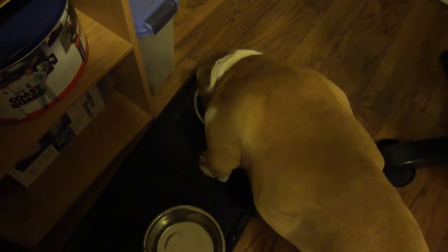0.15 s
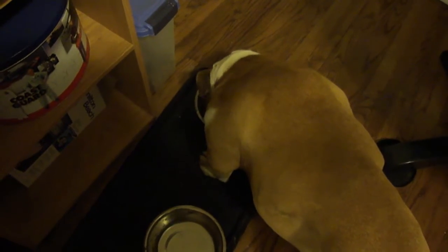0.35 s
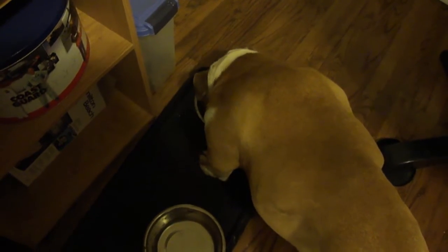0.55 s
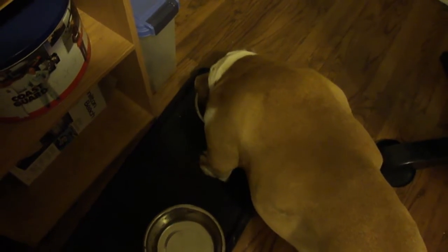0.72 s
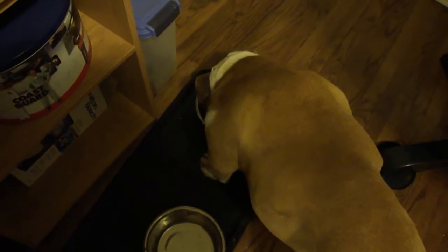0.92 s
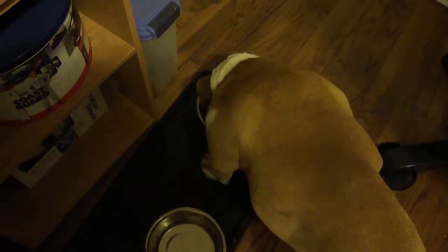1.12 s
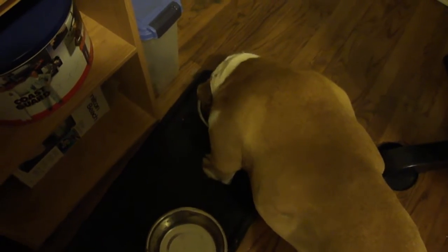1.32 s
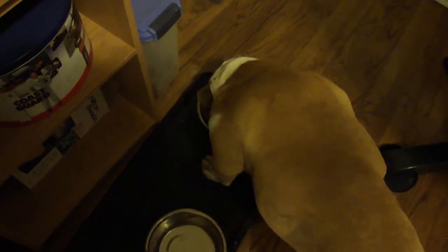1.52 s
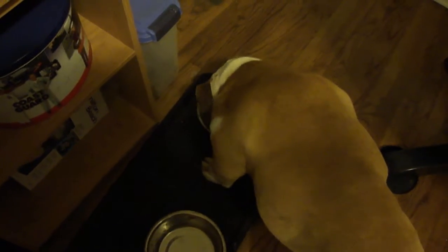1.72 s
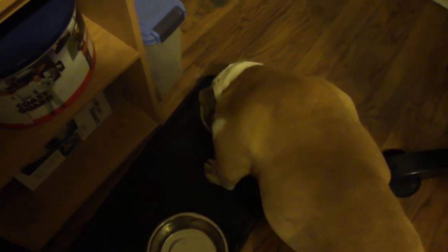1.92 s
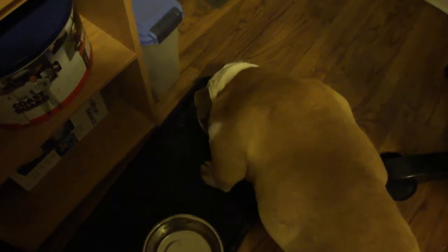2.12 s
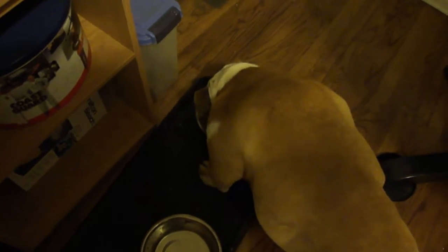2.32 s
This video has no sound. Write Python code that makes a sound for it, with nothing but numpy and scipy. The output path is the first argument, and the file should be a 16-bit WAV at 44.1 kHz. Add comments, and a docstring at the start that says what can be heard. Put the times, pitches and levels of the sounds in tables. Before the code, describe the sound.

Wet chomping and lip smacks of a dog eating from a metal bowl indoors.

```python
"""A dog gulps wet food from a bowl on the floor of a wooden room, about three bites a second.
Each bite is a lip smack and a few squelches of jaw and tongue, made of tiny bursting bubbles.
The bowl rings along, is nudged by the muzzle and bumps on its mat.
The room answers with short echoes, over a quiet, steady background noise."""
import sys
import numpy as np
from scipy import signal
from scipy.fft import rfft, irfft
from scipy.io import wavfile

SR = 44100
rng = np.random.default_rng(int(sys.argv[2]) if len(sys.argv) > 2 else 0)


def unload_audio(sound):
    """Save the sound as a 16-bit wav file, at the path given as the first command line argument."""
    columns = np.transpose(np.atleast_2d(sound))
    # keep every value between -1 and 1, then stretch to whole-number steps
    steps = np.round(np.clip(columns, -1, 1) * 32767)
    wavfile.write(sys.argv[1], SR, steps.astype(np.int16))


N = 110250

# Jaw and tongue crushing food. In every table, levels are relative to each other.
# peak_s, rise_s, fade_s, jaw_hz, jaw_db, hollow_hz, hollow_db, squelch_db, spray_db
FOOD_SQUEEZES = [ (0.208, 0.0064, 0.007, 440, -63, 1110, -45.5, -40, -46.5),
                 (.224, 0.0046, 0.0072, 427, -38, 1010, -31.5, -34.5, -49),
                 (.245, .0018, .0099, 455, -35, 990, -30, -49, -48),
                 (.272, 0.0048, .0092, 470, -46, 1110, -37, -34, -44.5),
                 (.316, 0.00057, 0.0092, 343, -19, 1086, -25.5, -29, -37),
                 (.346, .006, .0073, 387, -36, 1180, -21, -31.5, -37),
                 (.477, 0.0053, 0.005, 435, -49, 1100, -38.5, -37.5, -48.5),
                 (.566, 0.0059, 0.0042, 437, -29.5, 950, -27, -29, -37.5),
                 (.575, 0.0025, 0.0084, 410, -24, 928, -24.5, -28.5, -38),
                 (.610, 0.0058, 0.0079, 420, -40, 1100, -39, -31.5, -46),
                 (.655, 0.0052, 0.0085, 387, -32, 1035, -23, -29, -36.5),
                 (.668, .0055, 0.0092, 510, -34, 1190, -22, -21, -34.5),
                 (0.842, 0.0018, 0.0038, 454, -76, 1155, -36, -40.5, -58.5),
                 (.874, 0.00075, 0.019, 470, -49, 1080, -37, -39, -54.5),
                 (.906, .010, 0.0055, 440, -64, 1000, -38.5, -43, -61),
                 (.916, 0.00087, 0.007, 420, -31, 1040, -27.5, -30, -34.5),
                 (.947, 0.0049, 0.007, 500, -55, 970, -33.5, -36, -61),
                 (.980, .007, .010, 445, -32, 1100, -32, -28.5, -38.5),
                 (.999, 0.0037, 0.0067, 514, -33, 890, -33.5, -31, -39.5),
                 (1.017, .003, .007, 498, -32.5, 997, -29.5, -57, -61),
                 (1.163, 0.0047, 0.009, 315, -41.5, 920, -65, -65, -71.5),
                 (1.388, 0.00085, 0.0094, 390, -31, 970, -38, -29, -36.5),
                 (1.421, 0.0024, 0.012, 477, -34, 1094, -31, -34.5, -44),
                 (1.496, 0.0079, 0.0065, 449, -27, 1100, -28.5, -25, -38.5),
                 (1.520, 0.0028, 0.012, 597, -34.5, 1130, -26, -30.5, -47),
                 (1.588, 0.0084, 0.029, 413, -41.5, 1050, -43, -39.5, -52),
                 (1.66, 0.014, .020, 443, -41.5, 1000, -40, -49.5, -55),
                 (1.737, .0045, 0.0075, 432, -27.5, 1064, -27, -26, -33.5),
                 (1.757, 0.0047, 0.008, 395, -39, 1140, -42, -27.5, -38.5),
                 (1.816, 0.0057, .009, 463, -30.5, 908, -22.5, -27, -40),
                 (1.854, 0.0029, .0079, 555, -39.5, 960, -34.5, -46, -55),
                 (1.888, 0.0098, .014, 570, -41.5, 1110, -39, -38.5, -52.5),
                 (2.025, .003, 0.017, 410, -47.5, 1010, -35, -45, -48),
                 (2.076, .014, 0.009, 440, -37, 1040, -33.5, -38.5, -49),
                 (2.106, 0.0013, .012, 320, -23, 995, -29, -32, -44),
                 (2.144, .005, .0076, 327, -30, 810, -27, -33, -47),
                 (2.170, .006, 0.011, 465, -40.5, 900, -31.5, -34, -49.5),
                 (2.229, .0021, .011, 545, -42, 980, -38, -61, -70),
                 (2.483, 0.0051, .013, 430, -48, 1010, -47, -53, -70)]
# Lips and tongue unsticking: start_s, level_db, pitch_hz, attack_s, ring_s, glide_octaves_per_s
LIP_SMACKS = [ (.063, -47, 9300, .0007, 0.0034, -1.5), (0.123, -38, 1640, 0.00066, 0.0033, -4),
              (.125, -45, 2960, 0.001, 0.023, 2), (0.206, -35, 5900, 0.0008, 0.0023, -5),
              (0.214, -24.5, 3254, 0.0046, 0.0086, 4.5), (0.246, -28, 1530, 0.0011, 0.0063, 29.5),
              (.268, -28, 2730, 0.0023, 0.0085, 4), (.333, -10, 2025, 0.0018, 0.0037, 26),
              (.521, -37, 1464, 0.00074, 0.021, -14), (.560, -17.5, 2130, 0.0048, 0.0055, 7.5),
              (.545, -16.5, 867, 0.032, 0.011, 7), (0.566, -23, 6700, .0003, 0.0011, -17),
              (.572, -17, 3840, 0.00053, 0.0022, 8), (0.886, -36.5, 2048, 0.0018, 0.011, -21.5),
              (.915, -21.5, 462, 0.0014, 0.0045, 5), (0.917, -22, 3800, 0.00072, 0.0037, 5.5),
              (0.999, -31, 6400, 0.0012, 0.002, -1), (1.009, -19.5, 3494, 0.0011, 0.0023, 27.5),
              (1.388, -22, 3296, 0.00068, 0.0036, -16), (1.389, -15, 2893, 0.003, 0.0065, -5),
              (1.422, -30.5, 5480, 0.0018, 0.0064, -4), (1.42, -27, 2674, 0.0018, 0.011, 3.5),
              (1.479, -17.5, 1478, 0.0029, 0.0037, 13), (1.497, -20.5, 2372, 0.011, 0.017, 5),
              (1.504, -30, 6020, 0.0012, 0.0029, -3), (1.706, -18, 1996, 0.00047, 0.0038, -19),
              (1.709, -35.5, 3470, .0005, 0.045, 5.5), (1.716, -28.5, 1662, 0.0098, 0.02, -47.5),
              (1.808, -10, 1074, 0.0093, 0.0058, -15), (1.819, -19, 2089, 0.003, 0.012, -33.5),
              (1.872, -32.5, 591, 0.0097, 0.016, -1.5), (2.017, -21.5, 2125, 0.0018, 0.0091, -5.5),
              (2.02, -23.5, 2790, 0.0012, 0.009, -7.5), (2.07, -30.5, 3706, 0.0051, 0.013, 5.5),
              (2.135, -23.5, 549, 0.0051, 0.0095, 43.5), (2.226, -34, 1998, 0.0012, 0.0096, 2)]
# Light knocks on the bowl: start_s, level_db
MUZZLE_KNOCKS = [(0.125, -33.5), (1.296, -39), (2.423, -38)]
# The bowl shifting on its mat: peak_s, length_s, level_db
MAT_BUMPS = [(.313, 0.012, -44), (.975, 0.023, -43.5), (1.615, 0.086, -43), (2.105, 0.022, -48),
             (2.21, 0.026, -49)]
# The bowl's tones with the muzzle in it: pitch_hz, ring_s (time to fade by 60 dB), level_db
BOWL_TONES = [(423, 0.098, -3), (568, 0.056, 1.5), (713, 0.21, 8), (822.2, 0.29, 0.5), (956, 0.029, -0.5),
              (1102.5, 0.024, 3), (1182, 0.25, -1.5), (1580, 0.078, 4), (2050, 0.052, -3)]
# Echoes from floor and cabinet: delay_s, gain
NEAR_ECHOES = [(.0021, 0.18), (.0089, -0.18), (0.0153, -0.14)]
# How long the room rings: pitch_hz, ring_s (time to fade by 60 dB)
ROOM_RING_TIMES = [(150, 0.45), (500, 0.38), (2000, 0.42), (10000, 0.33)]
# Tone colour of the room's ringing: pitch_hz, level_db
ROOM_COLOUR = [(150, -12), (500, 2.5), (1400, -5), (3700, -1.5), (10000, -3)]
# Tone colour of the background noise: pitch_hz, level_db
NOISE_COLOUR = [(50, -21.5), (120, -5.5), (220, -4.5), (400, 0), (1000, 2.5), (2000, -5), (4000, -14.5),
                (11000, -20.5)]

BUBBLE_ONSET_CYCLES, BUBBLE_RISE_PER_CYCLE, BUBBLE_SCATTER_DB = 0.8, 0.013, 4.2
SWELL_SPAN = 4  # a bubble cloud starts this many rise times before its peak
FLUTTER_SHARE, FLUTTER_HZ = 0.67, 500
TICK_GAIN, TICK_S = 0.31, 0.0007
KNOCK_HZ, KNOCK_RISE_S = 968, 0.0046


def chomps():
    """Each squeeze of food thumps the jaw, pops in the hollow of the mouth, squelches and sprays."""
    out = np.zeros(N)
    for peak_s, rise_s, fade_s, jaw_hz, jaw_db, hollow_hz, hollow_db, squelch_db, spray_db in FOOD_SQUEEZES:
        jaw = bubbles(rise_s, fade_s, jaw_hz, spread_octaves=0.19, ring_cycles=0.99, count=14)
        hollow = bubbles(rise_s, fade_s, hollow_hz, spread_octaves=0.24, ring_cycles=1.55, count=28)
        squelch = bubbles(rise_s, fade_s, pitch_hz=2620, spread_octaves=0.853, ring_cycles=4, count=70)
        spray = bubbles(rise_s, fade_s, pitch_hz=6970, spread_octaves=0.537, ring_cycles=6.5, count=100)
        sound = amp(jaw_db) * jaw + amp(hollow_db) * hollow
        sound += amp(squelch_db) * squelch + amp(spray_db) * spray
        add(out, peak_s - SWELL_SPAN * rise_s, sound)
    return out


def bubbles(rise_s, fade_s, pitch_hz, spread_octaves, ring_cycles, count):
    """Tiny bubbles burst around one loud moment. Each pop is a short tone that rises in pitch."""
    time_jitter, pitch_jitter, coin = rng.random((3, count))
    gains = amp(BUBBLE_SCATTER_DB * rng.standard_normal(count))
    even_s = (rise_s + fade_s) * (np.arange(count) + time_jitter) / count - rise_s
    away = np.maximum(-even_s / rise_s, even_s / fade_s)  # 0 at the peak, 1 where the pops thin out
    offsets_s = even_s * SWELL_SPAN * (1 + away) / 2
    gains *= np.exp(np.minimum(offsets_s / rise_s, -offsets_s / fade_s)) * np.sqrt(0.5 + away)
    gains *= np.sign(coin - 0.5)
    detune = 2 * (rng.permutation(count) + pitch_jitter) / count - 1
    pitches_hz = pitch_hz * 2 ** (spread_octaves * detune)
    cloud = np.zeros(SR // 2)
    for start_s, gain, hz in zip(offsets_s + SWELL_SPAN * rise_s, gains, pitches_hz):
        cycles = hz * np.arange(0, 6 * ring_cycles / hz, 1 / SR)
        shape = (1 - np.exp(-cycles / BUBBLE_ONSET_CYCLES)) * np.exp(-cycles / ring_cycles)
        tone = np.sin(2 * np.pi * cycles * (1 + BUBBLE_RISE_PER_CYCLE * cycles / 2))
        add(cloud, start_s, gain * shape * tone)
    return cloud * np.sqrt((rise_s + fade_s) * SR / (np.sum(cloud ** 2) + 1e-20))


def lip_smacks():
    """A wet seal breaks with a tick. The air pocket behind it rings, wavering and gliding as it resizes."""
    out, t = np.zeros(N), seconds(3600)
    smooth = signal.butter(2, FLUTTER_HZ, fs=SR, output="sos")
    for start_s, level_db, pitch_hz, attack_s, ring_s, glide in LIP_SMACKS:
        noise_a, noise_b, tick_noise = rng.standard_normal((3, len(t)))
        phase = 2 * np.pi * np.cumsum(pitch_hz * 2 ** (glide * t)) / SR
        shape = (1 - np.exp(-t / attack_s)) * np.exp(-t / ring_s)
        tone = unit_level(np.sin(phase) * shape)
        wobble = signal.sosfilt(smooth, noise_a + 1j * noise_b)
        flutter = unit_level((wobble * np.exp(1j * phase)).real * shape)
        rough = FLUTTER_SHARE * min(pitch_hz / 2000, 1)  # small, high pockets flutter most
        ring = (np.sqrt(1 - rough ** 2) * tone + rough * flutter) * np.sqrt(np.mean(shape ** 2))
        tick = TICK_GAIN * tick_noise * shape * np.exp(-t / TICK_S)
        add(out, start_s, amp(level_db) * (ring + tick))
    return out


def ringing_bowl(mouth):
    """The mouth is too small to give out bass. The rest of its sound is heard and sets the bowl ringing."""
    t = seconds(12000)
    ring = np.zeros(len(t))
    for pitch_hz, ring_s, level_db in BOWL_TONES:
        gain = amp(level_db) * 2 * np.log(1000) / (ring_s * SR)
        ring += gain * amp(-60 * t / ring_s) * np.cos(2 * np.pi * pitch_hz * t)
    no_bass = signal.sosfilt(signal.butter(5, 245, "highpass", fs=SR, output="sos"), mouth)
    return no_bass + signal.fftconvolve(no_bass, ring)[:N]


def muzzle_knocks():
    """The soft muzzle nudges the bowl, which gives one brief tone."""
    out, t = np.zeros(N), seconds(4000)
    shape = t / KNOCK_RISE_S * np.exp(1 - t / KNOCK_RISE_S)
    for start_s, level_db in MUZZLE_KNOCKS:
        add(out, start_s, amp(level_db) * shape * np.sin(2 * np.pi * KNOCK_HZ * t))
    return out


def mat_bumps(band_hz=(131, 261)):
    """The bowl shifts on its mat with dull, low rumbles."""
    out, t = np.zeros(N), seconds(12000)
    band = signal.butter(4, band_hz, "bandpass", fs=SR, output="sos")
    for peak_s, length_s, level_db in MAT_BUMPS:
        shape = t / length_s * np.exp(-2 * t / length_s)
        rumble = unit_level(signal.sosfilt(band, rng.standard_normal(len(t)) * shape))
        add(out, peak_s - length_s / 2, amp(level_db) * rumble * np.sqrt(length_s / t[-1]))
    return out


def wooden_room(sound, head_sway_s=1.099, tails=4):
    """The sound itself, a few near echoes, and echo tails that take turns as the dog's head sways."""
    out = sound.copy()
    for delay_s, gain in NEAR_ECHOES:
        add(out, delay_s, gain * sound)
    for turn in range(tails):
        away = np.abs((seconds(N) / head_sway_s * tails - turn) % tails - tails / 2)
        share = np.cos(np.pi / 2 * np.minimum(away, 1))
        out += signal.fftconvolve(sound * share, echo_tail())[:N]
    return out


def echo_tail(build_s=0.0075):
    """Many small echoes blur together, and each pitch dies away at its own speed."""
    echoes = rng.choice([-1., 1.], 32768) * (rng.random(32768) < 0.25)
    hz, t, bands = signal.stft(echoes, SR, nperseg=256)
    ring_s = look_up(ROOM_RING_TIMES, hz)[:, None]
    bands = bands * amp(look_up(ROOM_COLOUR, hz)[:, None] - 60 * t / ring_s)
    bands *= np.sqrt(2 * np.log(1000) / (ring_s * SR))  # ringing longer adds no energy
    tail = signal.istft(bands, SR, nperseg=256)[1] / echoes.std()
    return tail * np.minimum(seconds(len(tail)) / build_s, 1)


def room_noise(level_db=-49.5):
    """A quiet, steady rush in the background."""
    colour = amp(look_up(NOISE_COLOUR, np.fft.rfftfreq(N, 1 / SR)))
    noise = irfft(rfft(rng.standard_normal(N)) * colour, N)
    return amp(level_db) * unit_level(noise)


def amp(db):
    """Turns decibels into a gain to multiply by."""
    return 10 ** (np.asarray(db) / 20)


def unit_level(sound):
    """Scales a sound so its average level (rms) is 1."""
    return sound / np.sqrt(np.mean(sound ** 2) + 1e-20)


def look_up(table, hz):
    """Reads between a table's rows, with pitch spaced in octaves."""
    pitches_hz, values = np.transpose(table)
    return np.interp(np.log(hz + 1), np.log(pitches_hz + 1), values)


def add(mix, start_s, sound):
    """Mixes a sound in at its start time."""
    part = mix[max(round(start_s * SR), 0):][:len(sound)]
    part += sound[:len(part)]


def seconds(samples):
    """The time of each sample."""
    return np.arange(samples) / SR


def scene():
    """The dog's mouth and its bowl sound in the room, in one channel."""
    mouth = amp(-2.21) * chomps() + amp(2.0) * lip_smacks()
    eating = ringing_bowl(mouth) + muzzle_knocks() + amp(-3.0) * mat_bumps()
    return (wooden_room(eating) + room_noise())[None]


def record(dry):
    """Cuts away the highest treble."""
    cutoff_hz = 11050
    lowpass = signal.firwin(401, cutoff_hz, window=("kaiser", 8), fs=SR)
    return signal.oaconvolve(dry, lowpass[None], "same")


dry = scene()
out = record(dry)
unload_audio(out)
```